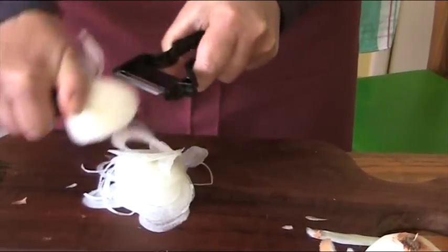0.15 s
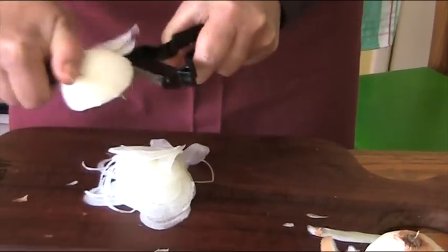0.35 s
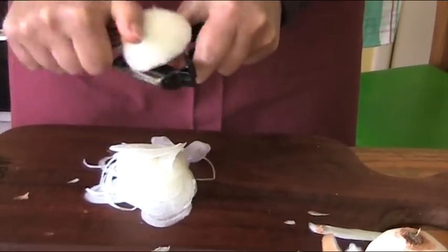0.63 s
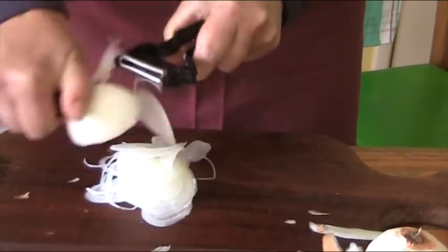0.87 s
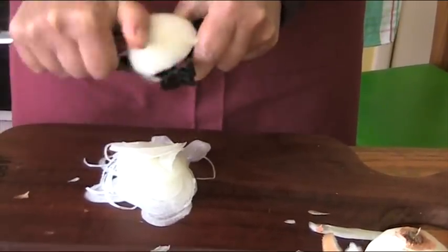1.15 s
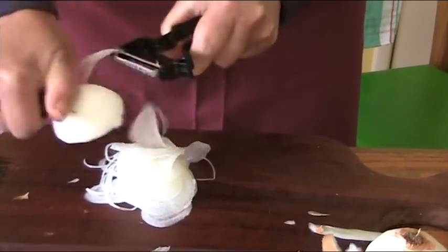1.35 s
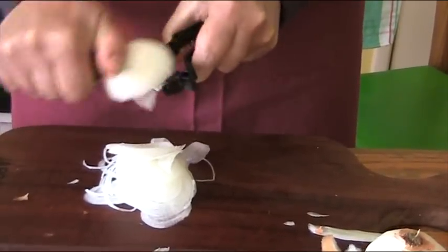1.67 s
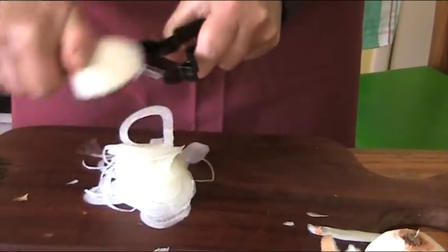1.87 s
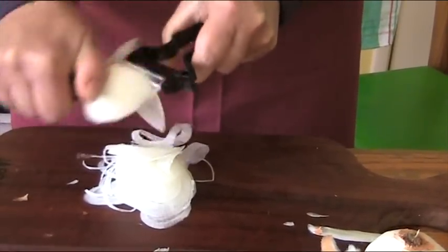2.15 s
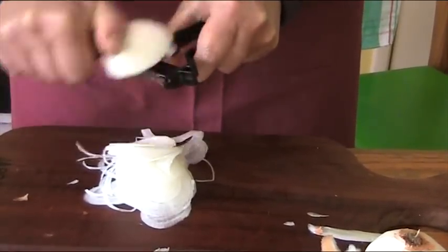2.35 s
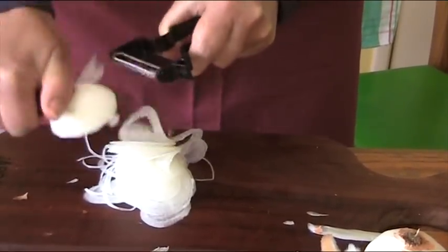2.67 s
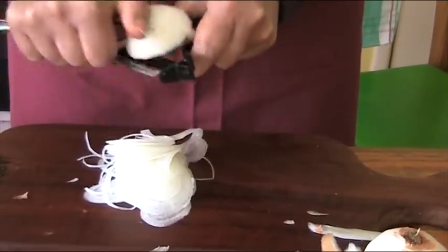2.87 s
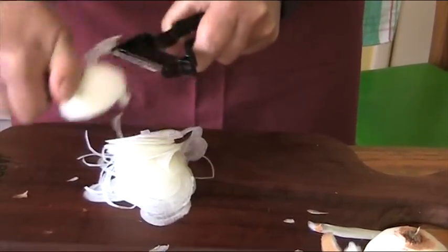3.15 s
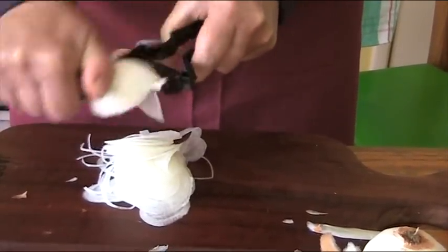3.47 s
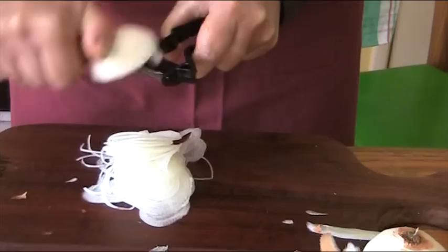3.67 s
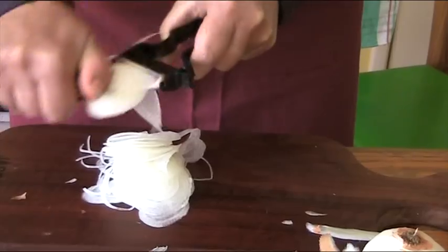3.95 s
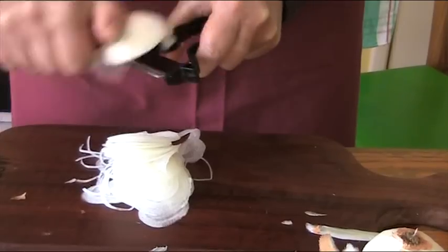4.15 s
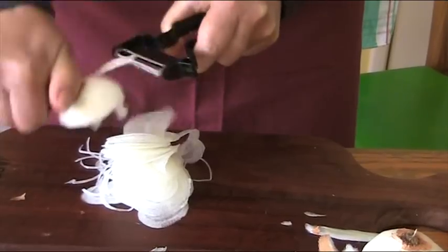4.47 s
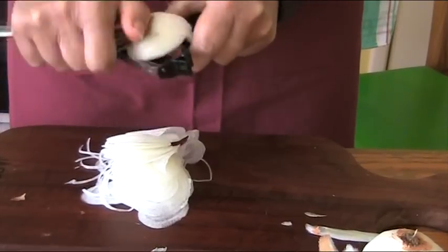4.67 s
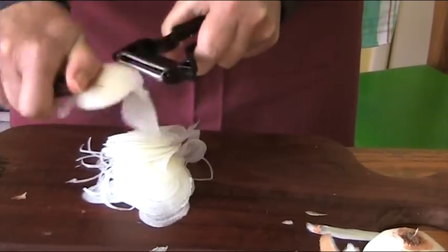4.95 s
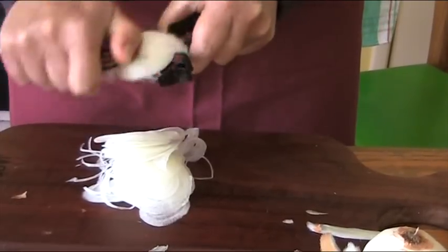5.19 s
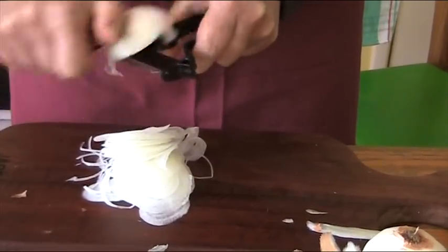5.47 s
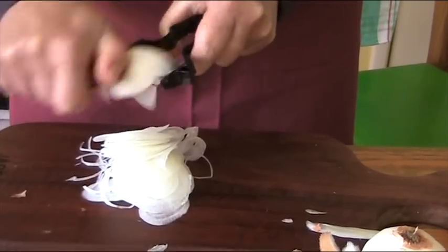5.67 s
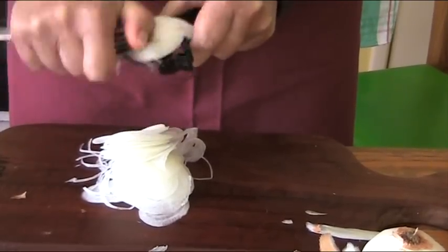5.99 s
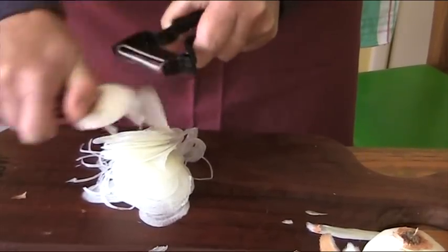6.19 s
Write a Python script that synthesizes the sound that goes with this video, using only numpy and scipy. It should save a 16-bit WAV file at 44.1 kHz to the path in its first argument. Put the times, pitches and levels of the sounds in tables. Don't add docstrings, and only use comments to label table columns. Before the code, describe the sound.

Close, juicy slicing strokes on a loose peeler blade, each biting, rasping and snapping free, with handle knocks over faint room hum.

```python
import sys
import numpy as np
from scipy import signal
from scipy.fft import rfft, irfft
from scipy.io import wavfile
from scipy.ndimage import uniform_filter1d

SR = 44100
rng = np.random.default_rng(int(sys.argv[2]) if len(sys.argv) > 2 else 0)


def to_wav(s):
    ch = np.atleast_2d(s).T
    pcm = np.round(np.clip(ch, -1, 1) * 32767)
    wavfile.write(sys.argv[1], SR, pcm.astype(np.int16))


def gain_from_db(level_db):
    decades = np.asarray(level_db, float) / 20
    return 10 ** decades


N = 279153
TIME = np.arange(N) / SR

# blade enters in seconds, slice tears free in seconds,
# rasp level on entry in dB, rasp level at full pressure in dB, flesh thud at the tear in dB relative.
STROKES = [(-.1, 0.069, -17, -34.5, -4.5), (0.709, 0.88, -39.5, -34.5, -1),
           (1.168, 1.322, -42.5, -32.5, -3), (1.62, 1.76, -40, -32, -3), (2.026, 2.198, -37.5, -33.5, -4),
           (2.464, 2.629, -41, -32.5, -5.5), (2.916, 3.08, -42.5, -33.5, -7.5),
           (3.355, 3.527, -43.5, -32.5, -5), (3.818, 3.996, -45, -33, -6.5),
           (4.268, 4.411, -42.5, -33.5, -4), (4.696, 4.921, -40.5, -36.5, -4.5),
           (5.154, 5.309, -49, -32, -9.5), (5.576, 5.737, -49.5, -31.5, -7.5), (6.09, 6.196, -36, -34, -11)]
# time in seconds, peak in dB, brightest pitch in Hz, sharpness in dB.
BITES = [(.6656, -31.5, 2730, -21), (0.6966, -29.5, 6000, -14), (1.149, -25.5, 5660, -5),
         (1.1867, -26.5, 7500, 1), (1.6023, -29, 7000, -9), (1.6293, -26.5, 6560, -10),
         (2.0322, -14.5, 11400, -18), (2.047, -27, 5190, -13), (2.467, -21, 7060, -32),
         (2.473, -18, 2140, 4), (2.484, -20.5, 7100, -13), (2.9182, -13.5, 7100, -17),
         (2.9232, -19.5, 2200, -11), (2.926, -16, 7900, 2), (3.3625, -22, 5100, -23),
         (3.8275, -21.5, 2270, -22), (3.8332, -22, 5360, -19), (4.2705, -24.5, 6770, -13),
         (4.276, -21.5, 7250, -10), (4.6936, -23, 5170, -14), (4.7032, -40, 6790, 1),
         (4.72, -38, 6770, -17), (5.1611, -24, 7350, -6), (5.166, -21, 6830, -1), (5.6027, -29, 6670, -19),
         (6.0838, -37, 5600, -17), (5.5765, -32.5, 5000, -14), (6.095, -25, 6000, -10)]
# pitch in Hz, width in Hz, level in dB.
FRAME = [(1203, 20, -3), (2262, 50, -3), (2730, 76, 4.5), (3370, 160, -3), (5190, 53, 3.5),
         (6090, 600, -4.5), (6770, 83, -0.5), (7290, 220, 2.5), (8190, 420, -3.5), (11350, 250, 5),
         (13100, 450, 5)]


def level(x, db):
    return x * gain_from_db(db) / np.sqrt(np.mean(x ** 2))


def response(points, size=1024):
    hz, db = np.transpose(points)
    bins_hz = np.maximum(np.arange(size // 2 + 1), 1) * SR / size
    gain_db = np.interp(np.log(bins_hz), np.log(hz), db)
    cepstrum = irfft(np.log(gain_from_db(gain_db)))
    cepstrum[1:size // 2] *= 2
    cepstrum[size // 2 + 1:] = 0
    return irfft(np.exp(rfft(cepstrum)))


def unshifted(points):
    return np.fft.fftshift(irfft(np.abs(rfft(response(points)))))[1:]


def through(x, h):
    return signal.fftconvolve(x, h)[:len(x)]


def ring(x, hz, width_hz):
    return signal.lfilter(*signal.iirpeak(hz, hz / width_hz, fs=SR), x)


def band(x, lo_hz, hi_hz):
    return signal.sosfilt(signal.butter(3, [lo_hz, hi_hz], "band", fs=SR, output="sos"), x)


def walk(rate_hz):
    hold = max(int(SR / rate_hz), 1)
    steps = np.repeat(rng.standard_normal(N // hold + 1), hold)
    return uniform_filter1d(uniform_filter1d(steps, hold), hold)[:N]


def slicing(cells_per_s=12000, frame_db=-2.0, patchy_db=2.0, layers_db=1.5):
    # pitch in Hz, level in dB.
    rasp_colour = [(120, -49), (200, -22), (353, -14), (424, -14), (735, -3.5), (986, -10), (1160, -4),
                   (1450, -4), (2210, -2.5), (3370, -3), (4270, -4), (5940, -1.5), (9930, -7), (13100, -12),
                   (16000, -17.5)]
    zones_hz = [800, 2400, 5500, 12000]
    cells = (rng.random(N) < cells_per_s / SR) * rng.standard_normal(N)
    frame = sum(gain_from_db(db) * ring(cells, hz, width_hz) for hz, width_hz, db in FRAME)
    rasp = through(cells + gain_from_db(frame_db) * frame, response(rasp_colour))
    rasp = rasp / np.std(band(rasp, 2900, 10900))
    pressure_db, thud_db, buzz_db, hiss_db = stroke_curves()
    edges_hz = 200 * 2 ** np.arange(0, 6.6, .3)
    out = 0
    for lo, hi in zip(edges_hz, edges_hz[1:]):
        share = [np.interp(np.log(lo * hi) / 2, np.log(zones_hz), unit) for unit in np.eye(4)]
        colour_db = share[0] * (thud_db + 12) + share[1] * (buzz_db + 4) + share[3] * (hiss_db + 4.5)
        out = out + band(rasp, lo, hi) * gain_from_db(colour_db + patchy_db * walk(25))
    out = out + handle_buzz(cells) * gain_from_db(buzz_db - 4.5)
    return out * gain_from_db(pressure_db + layers_db * walk(130))


def stroke_curves(bite_s=0.0023, settle_s=0.0073, release_s=0.025, fade_s=0.15):
    shudder_s, rise_s = 0.033, 0.022
    pressure, thud, buzz, hiss = [], [], [], []
    progress = np.linspace(0, 1, 9)
    for start, tear, entry_db, full_db, top_db in STROKES:
        settled, end = start + settle_s, tear + release_s
        faded = end + fade_s
        swell_s = settled + progress * (tear - settled)
        swell_db = entry_db + (full_db - entry_db) * progress ** 0.41
        pressure += [(start - bite_s, -110), (start, entry_db - 11), *zip(swell_s, swell_db),
                     (end, full_db - 12.5), (faded, -79)]
        shudder = tear - shudder_s
        thud += [(start, -14.5), (shudder, -14.5), (min(shudder + rise_s, tear), top_db), (tear, top_db),
                 (end, -7.5), (faded, -7.5)]
        buzz += [(start, -4), (tear - rise_s, -4), (tear, -4), (end, -0.5), (faded, -0.5)]
        hiss += [(start, -3), (tear - rise_s, -5), (tear, -3), (end, -8), (faded, -8)]
    curves = [np.interp(TIME, *np.transpose(rows)) for rows in (pressure, thud, buzz, hiss)]
    pressure_db, thud_db, buzz_db, hiss_db = curves
    burst_s, burst_db = 0.0023, -15
    power = gain_from_db(2 * pressure_db)
    for s, db, *_ in BITES:
        after = slice(int(s * SR), int(s * SR) + 4000)
        age = np.abs(TIME[after] - s) / burst_s
        power[after] += gain_from_db(2 * (db + burst_db)) * age * np.exp(1 - age)
    bursting = 1 - gain_from_db(2 * pressure_db) / power
    return 10 * np.log10(power), thud_db - 7 * bursting, buzz_db, hiss_db + 3 * bursting


def handle_buzz(cells, buzz_hz=2260, width_hz=160, lasting_s=0.081, buzz_db=-3):
    starts = np.transpose(STROKES)[0]
    latest = np.clip(np.searchsorted(starts, TIME) - 1, 0, None)
    age_s = TIME - starts[latest]
    return level(ring(cells, buzz_hz, width_hz), buzz_db) * np.exp(-np.abs(age_s) / lasting_s)


def knocks(size=1500, focus_db=0.5, rise_ms=0.73, soften_per_db=0.023):
    # pitch in Hz, level in dB.
    knock_colour = [(880, -67), (1500, 0), (2770, 0), (4240, 1), (6430, -0.5), (7100, -4.5), (8400, 0.5),
                    (13400, -16.5), (16000, -24.5)]
    ms = np.arange(size) * 1000 / SR
    crack, thud = np.zeros((2, N + size))
    for s, db, hz, dying_ms, sharp_db, thud_db in all_knocks():
        rise = rise_ms * (1 + soften_per_db * max(-18.5 - db, 0))
        fall = np.exp(-(ms / max(1.07 * dying_ms, .3)) ** 1.11)
        rattle = rng.standard_normal(size) * (1 - np.exp(-(ms / rise) ** 2)) * fall
        spectrum = rfft(rattle)
        evened = spectrum / np.sqrt(uniform_filter1d(np.abs(spectrum) ** 2, size=16))
        rattle = irfft(evened, size) * (ms < 25)
        frame = sum(gain_from_db(d) * ring(rattle, f, 2 * width_hz) for f, width_hz, d in FRAME)
        broad = through(rattle + gain_from_db(2) * frame, response(knock_colour))
        spot = level(ring(rattle, hz, hz / 7), focus_db)
        edge = level(band(broad, 8900, 15500), sharp_db + 0.5)
        bright = level(broad, 0) + spot + edge
        first = int(s * SR) - 50
        at = slice(first, first + size)
        crack[at] += gain_from_db(db) * bright / np.abs(bright).max()
        thud[at] += gain_from_db(db + thud_db) * rattle / np.abs(rattle).max()
    return (crack + gain_from_db(19.5) * band(thud, 673, 1750))[:N]


def all_knocks():
    # time in seconds, peak in dB, brightest pitch in Hz, sharpness in dB,
    # thud in dB relative.
    snaps = [(0.0528, -23.5, 6950, -19, -7), (.8068, -20.5, 6680, -21, -27),
             (0.8628, -23.5, 7150, -17, -8.5), (.8774, -23.5, 2200, -17, -9), (1.3266, -31, 2850, -22, -5),
             (2.198, -34, 7200, -17, -13), (2.6226, -18.5, 2630, -16, -32), (3.0784, -22.5, 2810, -18, -14),
             (3.9987, -13.5, 6950, 2, -21), (4.922, -36, 2660, -11, -12), (4.935, -28, 6720, -18, -17),
             (5.305, -25, 2700, 1, -28), (5.7342, -23, 7400, -9, -7.5), (5.744, -18.5, 6950, -11, -24),
             (6.196, -18, 7400, -2, -16)]
    # time in seconds, peak in dB, brightest pitch in Hz, sharpness in dB.
    rebounds = [(0.0822, -24.5, 5700, 5), (0.9007, -29, 2780, -16), (1.3432, -38, 3430, -23),
                (1.3653, -35, 5180, -20), (1.7768, -42, 6790, -23), (2.216, -26.5, 2200, -4),
                (2.646, -23.5, 6900, 2), (2.674, -32, 5150, -5), (3.0984, -28, 11300, -14),
                (3.1215, -26.5, 7300, -13), (3.5464, -32, 2200, -7), (4.0505, -37, 3400, -28),
                (4.4353, -27.5, 3530, -12), (4.9753, -31, 11300, -24), (5.3578, -32, 6200, -17),
                (5.779, -28, 7240, -16), (6.2239, -25.5, 8800, -15)]
    # time in seconds, peak in dB,
    # brightest pitch in Hz, dying time in ms, sharpness in dB.
    clacks = [
        (1.053, -14, 11600, 2.3, -18),
        (1.0556, -22, 8190, 5, -9),
        (1.0694, -25, 8190, 4.6, -13),
        (2.3633, -20, 3030, 1.4, -6),
        (2.364, -14, 6800, 1.76, 3),
        (2.3735, -26, 6740, 2.2, -6),
        (6.0088, -30, 2230, 7.9, -20),
        (6.03, -28.5, 6700, 4.8, -10),
    ]
    # time in seconds, peak in dB, brightest pitch in Hz,
    # dying time in ms, sharpness in dB.
    bumps = [
        (0.1883, -11, 5500, 2.9, -7),
        (.197, -7.5, 7130, 2.6, -1.5),
        (0.2064, -26, 7160, 2.6, -19),
        (.371, -22, 5570, 6.1, -1.5),
        (5.8786, -30, 5110, 2.2, -12),
        (5.882, -17, 5200, 3.4, -15),
        (5.8866, -20, 5850, 1.4, -8),
    ]
    # time in seconds, peak in dB, brightest pitch in Hz.
    ticks = [(.3994, -34.5, 2380), (.4232, -37, 7320), (1.038, -36, 2840), (1.4836, -40.5, 5900),
             (1.907, -47, 2400), (2.3466, -39, 2210), (3.683, -44, 5160), (4.577, -37.5, 2920),
             (4.586, -39, 5460), (4.6294, -43.5, 2200), (4.6384, -37.5, 2240), (4.669, -43, 3480),
             (5.083, -42, 2700), (5.4849, -46.5, 2870), (5.8924, -35, 5030), (6.043, -35, 6490)]
    return ([(s, db, hz, 4.2 + 1.68 * db, sharp, -28) for s, db, hz, sharp in BITES]
            + [(s, db, hz, 2.1, sharp, thud) for s, db, hz, sharp, thud in snaps]
            + [(s, db, hz, 3.9, sharp, -28) for s, db, hz, sharp in rebounds]
            + [(s, db, hz, ms, sharp, -29) for s, db, hz, ms, sharp in clacks]
            + [(s, db, hz, ms, sharp, -21.5) for s, db, hz, ms, sharp in bumps]
            + [(s, db, hz, 5, -28, -15) for s, db, hz in ticks])


def blade(struck_db=-11, others_db=-30, struck_t60_s=.19):
    # pitch in Hz, level in dB, t60 in seconds.
    blade_modes = [(2220, -10, 0.1), (5050, -4, 0.1), (6740, 15, 0.14), (7214, 3, 0.19), (8060, 18, 0.14),
                   (10900, -38, 0.36), (13320, -27, 0.21)]
    # time in seconds, peak in dB, strongest mode in Hz.
    rings = [
        (0.3716, -34, 5190),
        (1.0514, -27.5, 8130),
        (2.3645, -25.5, 6740),
    ]
    out = np.zeros(N)
    for s, peak_db, struck_hz in rings:
        t = np.clip(TIME - s, 0, None)
        modes = [(hz, db + others_db, t60) for hz, db, t60 in blade_modes]
        for hz, db, t60 in modes + [(struck_hz, struck_db, struck_t60_s)]:
            span = (t > 0) & (t < t60)
            decay = gain_from_db(peak_db + db - 60 * t[span] / t60)
            out[span] += decay * np.sin(2 * np.pi * hz * t[span])
    return out


def kitchen(gap_s=0.0071):
    # pitch in Hz, t60 in seconds.
    decays = [(250, 1), (700, 0.76), (1500, 0.66), (3000, 0.62), (6000, 0.58), (10000, 0.43), (15000, 0.2)]
    t = np.arange(SR) / SR
    hz, t60_s = np.transpose(decays)
    edges_hz = np.r_[100, np.sqrt(hz[1:] * hz[:-1]), 19000]
    tail = 0
    for lo, hi, t60 in zip(edges_hz, edges_hz[1:], t60_s):
        fall = gain_from_db(-60 * t / t60) * np.clip(t / gap_s - .5, 0, 1)
        tail = tail + band(rng.standard_normal(SR), lo, hi) * fall / np.sqrt(np.sum(fall ** 2))
    return tail


def drags(rise_s=0.011, fall_db_per_s=70, rough_db=3, wide_db=-8):
    # start in seconds, length in seconds, level in dB.
    events = [
        (4.286, 0.15, -47.5),
        (4.784, 0.1, -46),
    ]
    # pitch in Hz, width in Hz, level in dB.
    tones = [(286, 74, -1), (433, 110, -4), (685, 510, 1.5), (906, 280, 3.5)]
    shape = 0
    for s, lasts_s, db in events:
        fall_db = fall_db_per_s * np.clip(TIME - s - lasts_s, 0, None)
        shape = shape + gain_from_db(db - fall_db) * np.clip((TIME - s) / rise_s, 0, 1)

    def body():
        return sum(gain_from_db(db) * ring(ring(rng.standard_normal(N), hz, width_hz), hz, 2 * width_hz)
                   for hz, width_hz, db in tones)

    return level(body(), 0) * shape * gain_from_db(rough_db * walk(40)), level(body(), wide_db) * shape


def hum(spectrum, db, drone_db):
    # pitch in Hz, level in dB.
    mains = [(69, -69), (146, -70.5)]
    noise = level(through(rng.standard_normal(N), response(spectrum, size=8192)), db)
    noise = noise * gain_from_db(0.7 * walk(2))
    return noise + sum(level(ring(rng.standard_normal(N), hz, 9), line_db + drone_db) for hz, line_db in mains)


def scene():
    # pitch in Hz, level in dB.
    echo_mid = [(300, -8.5), (1000, -6.5), (3000, -9), (7000, -11), (15000, -18)]
    echo_side = [(300, -5), (1000, -36), (3000, -12), (7000, -16.5), (15000, -11.5)]
    # pitch in Hz, level in dB.
    near_side = [(300, -35), (1000, -48), (2600, -15), (5500, -9), (9000, -9), (11200, 1), (13000, -12),
                 (15000, -6)]
    # pitch in Hz, level in dB.
    left_lift = [(100, -17), (300, -7), (1000, -52), (10000, -52), (12500, -15)]
    # pitch in Hz, level in dB.
    hum_mid = [(15, -27), (25, -9.5), (114, -2), (263, -4), (344, -5.5), (427, -8), (575, -8.5), (659, -11),
               (4740, -18), (5140, -21), (12900, -32), (16000, -38)]
    hum_side = [(18, -42), (30, -9), (199, -4.5), (1390, -14.5), (2010, -16.5), (2750, -23), (3220, -19.5),
                (5040, -25), (5900, -25), (16000, -40)]
    near = slicing() + knocks() + blade()
    paths = rng.standard_normal(2400) * np.exp(-np.arange(2400) / 600)
    shifted = gain_from_db(-15.5) * np.imag(signal.hilbert(near))
    apart = shifted + through(near, paths / np.sqrt(np.sum(paths ** 2)))
    side = signal.fftconvolve(apart, unshifted(near_side), "same")
    side = side + through(near, through(kitchen(), response(echo_side)))
    mid = near + through(near, through(kitchen(), response(echo_mid)))
    mid = mid + hum(hum_mid, -56.5, -1.14)
    side = side + hum(hum_side, -54, 1.3) + signal.fftconvolve(mid, unshifted(left_lift), "same")
    far_mid, far_side = drags()
    mid, side = mid + far_mid, side + far_side
    return np.array([mid + side, mid - side])


def roll_off(x):
    return signal.sosfilt(signal.butter(12, 16960, fs=SR, output="sos"), x)


def record(dry):
    dry = signal.sosfilt(signal.butter(1, 40, "high", fs=SR, output="sos"), dry)
    mix = signal.sosfilt(signal.ellip(8, .2, 70, 16000, fs=SR, output="sos"), dry)
    return roll_off(mix)


dry = scene()
out = record(dry)
to_wav(out)
```